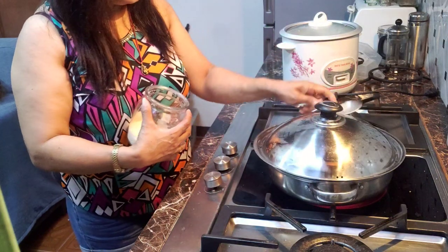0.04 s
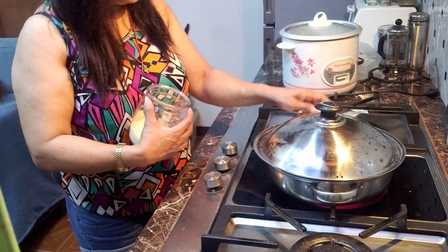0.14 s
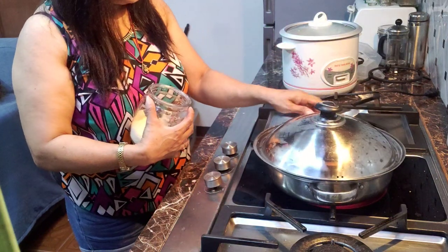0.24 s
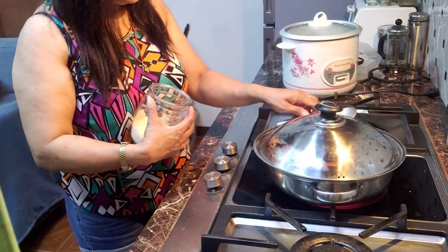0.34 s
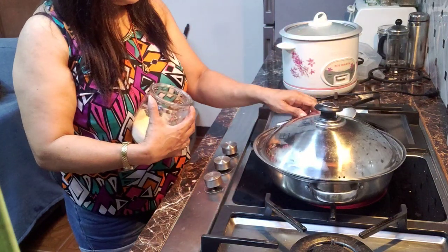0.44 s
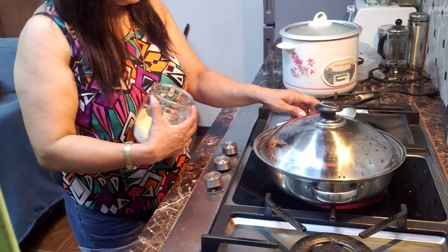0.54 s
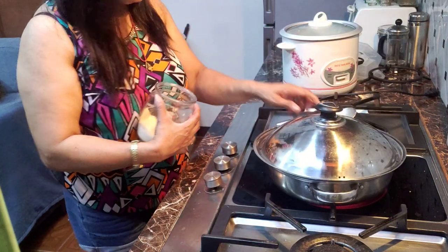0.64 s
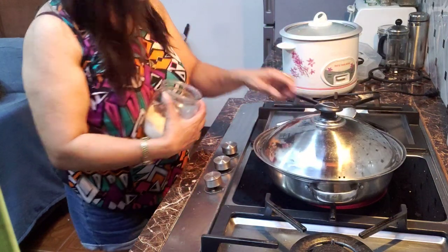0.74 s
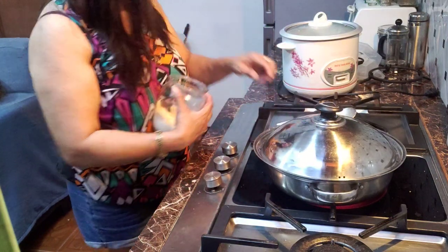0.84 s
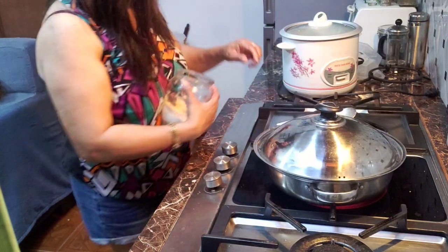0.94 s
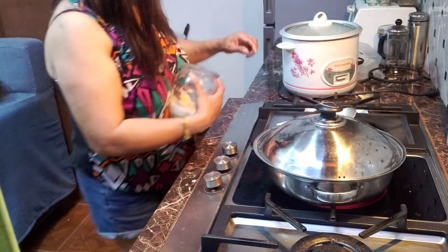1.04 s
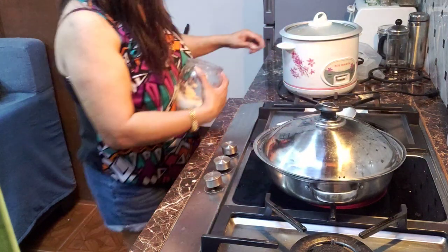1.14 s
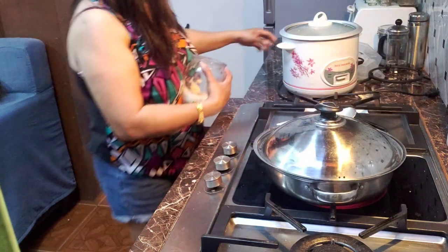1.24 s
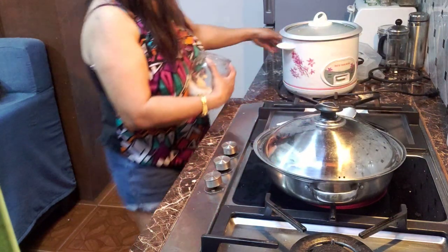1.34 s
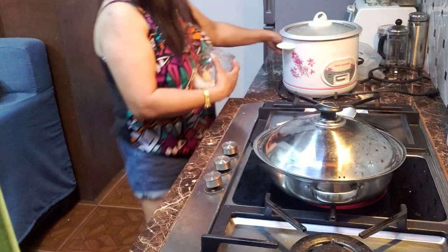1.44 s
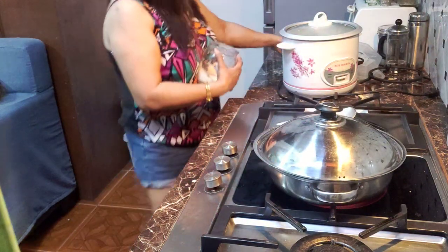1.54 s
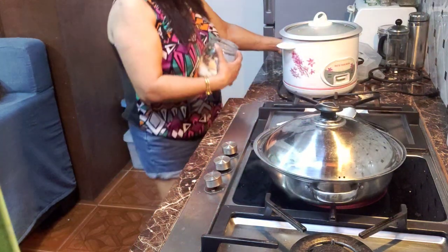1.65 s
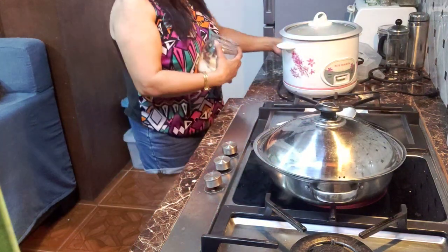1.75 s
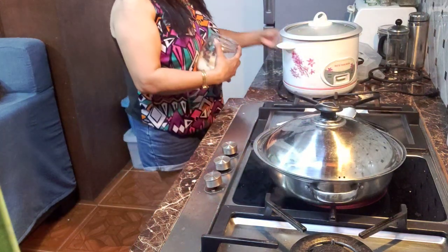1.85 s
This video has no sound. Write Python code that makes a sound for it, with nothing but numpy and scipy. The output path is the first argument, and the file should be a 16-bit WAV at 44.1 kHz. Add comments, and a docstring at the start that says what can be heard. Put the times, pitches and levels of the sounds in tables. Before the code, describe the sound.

A steel lid clanks onto a wide pan: knocks at about 0.25-0.34 s, then a second cluster at 0.42-0.47 s, with dull pan thuds, thin rim pings and bright grainy rattle fading by 0.6 s. Low uneven hum, deep rumble and faint hiss continue, with barely audible blips. Around 1.77-1.89 s a glass jar is softly set down with tiny ringing contacts. Short kitchen echo, close stereo, dulled top.

```python
"""A low lumpy hum, a deep rumble and a soft hiss run throughout in a small kitchen; faint blips come and go.
First a steel lid settles on a wide pan in two clusters of knocks: the pan thuds, the rim pings
and a rain of random grains makes a bright rattle. Later a jar is set down softly: its base thuds,
and its glass rings from tiny contacts and a short drag. The recorder turns down faint sound above the hum."""
import sys
import numpy as np
from scipy import signal
from scipy.fft import rfft, irfft, next_fast_len
from scipy.io import wavfile
from scipy.ndimage import uniform_filter1d

SR = 44100
rng = np.random.default_rng(int(sys.argv[2]) if len(sys.argv) > 2 else 0)


def wav_out(sig):
    """Save sig, one row per channel (or a flat mono array), as 16-bit PCM at SR to the path in sys.argv[1]."""
    wavfile.write(sys.argv[1], SR, np.round(np.clip(np.atleast_2d(sig).T, -1, 1) * 32767).astype(np.int16))


N = 83790
STRIKE_SPREAD_DB = 2.5  # chance in how hard each hit drives each mode


def from_db(db):
    """Decibels to gain."""
    return 10 ** (np.asarray(db, float) / 20)


def rms_one(x):
    """Scale to rms 1."""
    return x / np.sqrt(np.mean(x ** 2) + 1e-20)


def at_hz(points, hz):
    """Read a table between its points, on a log-frequency axis."""
    table_hz, values = np.array(points).T
    return np.interp(np.log(np.maximum(hz, 1)), np.log(table_hz), values)


def over_time(times, values):
    """Draw straight lines between points in time, one value per sample."""
    return np.interp(np.arange(N) / SR, times, values)


def lean(db):
    """Split a left-minus-right difference evenly over the two sides, in dB."""
    return db * np.array([[.5], [-.5]])


def colour(x, spectrum):
    """Shape a noise by a spectrum in dB, silent outside it; rms 1."""
    hz = np.fft.rfftfreq(N, 1 / SR)
    inside = (hz > spectrum[0][0]) & (hz < spectrum[-1][0])
    return rms_one(irfft(rfft(x) * from_db(at_hz(spectrum, hz)) * inside, N))


def band_pass(x, order, low_hz, high_hz):
    """Keep the sound between two pitches."""
    sos = signal.butter(order, [low_hz, high_hz], "band", fs=SR, output="sos")
    return signal.sosfilt(sos, x)


def drift(rate_hz):
    """Slow random wandering of rms 1: noise smoothed twice, made at every 40th sample."""
    r = np.exp(-80 * np.pi * rate_hz / SR)
    noise = rng.standard_normal(N // 40 + 2002)
    slow = signal.lfilter([1], [1, -2 * r, r * r], noise)[2000:]  # skip the start-up
    return np.interp(np.arange(N) / 40, np.arange(len(slow)), rms_one(slow))


def ring(clicks, hz, t60):
    """A unit click sets a sine of about height 1 ringing, which falls by 60 dB in t60 seconds."""
    r, w = from_db(-60 / (t60 * SR)), 2 * np.pi * hz / SR
    return signal.lfilter([0, np.sin(w)], [1, -2 * r * np.cos(w), r * r], clicks)


def strike(s, db, modes):
    """Hits at times s ring the modes; db holds one strength per hit and mode."""
    out = np.zeros(N)
    for k, (hz, level_db, t60) in enumerate(modes):
        clicks = np.full(N, 1e-18)
        clicks[(s * SR).astype(int)] = from_db(db[:, k] + level_db)
        out += ring(clicks, hz, t60)
    return out


def sing(grains, modes):
    """Modes kept ringing by a stream of grains; rms 1."""
    return rms_one(sum(from_db(db) * rms_one(ring(grains, hz, t60)) for hz, db, t60 in modes))


def octaves_off(modes, favoured_hz, most):
    """How far each mode lies from the pitch each hit favours, in octaves up to a limit."""
    mode_hz = np.array(modes)[:, 0]
    return np.minimum(np.abs(np.log2(mode_hz / favoured_hz[:, None])), most)


SHAKE_ATTACK_S = 0.0059


def dying(s, db, t60):
    """Each hit at a time s adds power that rises quickly and falls by 60 dB in t60 seconds."""
    t = np.maximum(np.arange(N) / SR - np.asarray(s)[:, None], 0)
    fall = from_db(2 * (db[:, None] - 60 * t / t60))  # doubled dB: power
    rise = 1 - np.exp(-t / SHAKE_ATTACK_S)
    return np.sqrt((fall * rise).sum(axis=0))


# rise and fall of the hum: (time [s], level [dB], left minus right [dB])
HUM_LEVEL = [(0, -41, 2.5), (.055, -48, 1), (0.079, -53.5, 4), (0.219, -52, 7), (.62, -52.5, 1),
             (.75, -51, 5), (0.849, -55, 7.5), (0.999, -55, 6), (1.12, -62.5, 14.5), (1.165, -51.5, 7),
             (1.22, -64.5, 18), (1.28, -46, 9), (1.35, -50, 2.5), (1.419, -60, 15), (1.501, -52.5, 7.5),
             (1.591, -53, 11), (1.66, -55.5, 7), (1.759, -56, 15), (1.9, -56.5, 4)]
# colour of the hum: (pitch [Hz], level [dB per Hz])
HUM_COLOUR = [(100, -34.5), (170, -9.5), (189, -17), (248, 2), (279, -4), (312, 0.5), (349, -7.5),
              (393, 0.5), (690, -38.5), (1000, -44), (1300, -63), (2200, -120)]
HUM_LUMPS_DB, HUM_LUMPS_HZ = 2.4, 19
HUM_LIKENESS = 0.8  # left-right likeness, 0 to 1


def hum():
    """Low noise in half-octave bands that swell and sink in lumps."""
    left, other = [colour(w, HUM_COLOUR) for w in rng.standard_normal((2, N))]
    right = HUM_LIKENESS * left + np.sqrt(1 - HUM_LIKENESS ** 2) * other
    both = np.array([left, right])
    out, together = 0, drift(HUM_LUMPS_HZ)
    edges = 80 * 2 ** np.arange(0, 4.6, .5)
    for low, high in zip(edges, edges[1:]):
        sos = signal.butter(2, [low, high], "band", fs=SR, output="sos")
        band = signal.sosfiltfilt(sos, both, padtype="even", padlen=SR // 10)
        # a little swelling shared by all bands, the rest each band's own and slower
        lumps = 0.23 * together + drift(HUM_LUMPS_HZ / 2)
        out = out + band * from_db(HUM_LUMPS_DB * lumps)
    s, db, lean_db = np.transpose(HUM_LEVEL)
    return rms_one(out) * from_db(over_time(s, db) + lean(over_time(s, lean_db)))


# colour of the rumble: (pitch [Hz], level [dB per Hz])
RUMBLE_COLOUR = [(12, -53), (38, -26.5), (59, -20), (77, -8.5), (155, 0), (180, -16), (230, -31.5),
                 (400, -120)]
# slow swell added to the base level: (time [s], level [dB])
RUMBLE_SWELL = [(.3, 5), (.8, 3.5), (1.12, -7.5), (1.349, -0.5), (1.9, 8.5)]
RUMBLE_BASE_DB = -66.5


def rumble():
    """Deep noise that swells slowly, mostly alike on both sides."""
    a, b = [colour(w, RUMBLE_COLOUR) for w in rng.standard_normal((2, N))]
    swell_db = over_time(*np.transpose(RUMBLE_SWELL)) + 2.5 * drift(2.2)
    sides = np.array([1.2 * a, 0.73 * a + .3 * b])
    return from_db(RUMBLE_BASE_DB + swell_db) * sides


# colour of the hiss: (pitch [Hz], level [dB per Hz])
HISS_COLOUR = [(530, -20.5), (900, -1.5), (1260, -25.5), (1400, -12), (1670, -15.5), (4010, -20.5),
               (6650, -10.5), (8400, -18.5), (10900, -62)]
HISS_DB = -82.5


def hiss():
    """Steady coloured noise, separate on each side."""
    return from_db(HISS_DB) * np.array([colour(w, HISS_COLOUR) for w in rng.standard_normal((2, N))])


# faint blips: (time [s], length [s], pitch [Hz], level before the swell [dB rms], left minus right [dB])
BLIPS = [(0.109, 0.049, 915, -74, -9), (1.052, 0.11, 6900, -81.5, 12), (1.082, 0.061, 736, -77, 6.5),
         (1.26, 0.026, 509.4, -62, 7.5), (1.365, 0.048, 900, -75, -7), (1.347, 0.072, 1980, -87, 13.5),
         (1.366, 0.044, 5500, -89, 5), (1.582, .02, 2400, -91, 6.5), (1.701, 0.037, 7420, -87, -7.5),
         (1.704, 0.016, 2500, -82, 10), (1.701, 0.031, 1980, -88, 3.5)]
BLIP_HALF_WIDTH_HZ = 70.0


def blips():
    """Short swells of narrow noise."""
    out, t = np.zeros((2, N)), np.arange(N) / SR
    for s, length, hz, db, lean_db in BLIPS:
        noise = band_pass(rng.standard_normal(N), 2, hz - BLIP_HALF_WIDTH_HZ, hz + BLIP_HALF_WIDTH_HZ)
        swell = np.sin(np.pi * np.clip((t - s) / length, 0, 1))
        out += rms_one(noise) * swell * from_db(db + lean(lean_db))
    return out


# lid knocks: (time [s], thud strength [dB], favoured thud pitch [Hz], rattle strength [dB],
#              rim ping strength [dB])
KNOCKS = [(0.2452, -12.5, 315, -40.5, -46.5), (.268, -17, 388, -42, -58.5),
          (.277, -15.5, 384, -41.5, -53.5), (0.2968, -7.5, 335.6, -30.5, -30),
          (0.313, -11.5, 352, -33, -27.5), (.328, -13.5, 385.6, -49, -46.5),
          (0.343, -22.5, 269.4, -56.5, -58.5), (0.4167, -7.5, 401, -29, -31),
          (0.4381, -4.5, 342.4, -35, -41), (.447, -14, 370, -34.5, -55.5), (.455, -18.5, 319.6, -41.5, -52),
          (0.472, -26, 394, -44, -38), (0.501, -32.5, 275.2, -60.5, -60), (0.543, -36, 315, -64, -84.5),
          (.582, -36.5, 332, -54, -90)]
# ringing modes of the pan body: (pitch [Hz], level [dB], time to fall 60 dB [s])
PAN_MODES = [(158, -15, 0.3), (252.8, -0.5, 0.26), (315.3, 0, 0.12), (377.7, 2.5, 0.1), (447, -8, 0.12),
             (559.6, -11, .1), (617.6, -11, 0.29), (810.8, -8.5, .3), (928, -3.5, 0.19)]
# ringing modes of the lid rim: (pitch [Hz], level [dB], time to fall 60 dB [s])
RIM_MODES = [(1328, -12, .08), (2180, -22.5, .08), (2782, -15.5, 0.19), (3075, -12, 0.2), (3440, -18, 0.12),
             (4374, -17.5, 0.082), (5165, -3.5, 0.061), (5570, -6.5, 0.09), (6090, -3, 0.061),
             (6180, -6, .06), (6660, -13.5, 0.12), (6950, 2.5, 0.05), (7230, -8.5, 0.08)]
# colour of the rattle: (pitch [Hz], level [dB per Hz])
RATTLE_COLOUR = [(500, -11), (763, -18.5), (977, -6.5), (1130, -26), (1340, -16.5), (2200, -28),
                 (3060, -22.5), (4200, -28.5), (5300, -20.5), (6880, -12.5), (7800, -18.5), (8300, -45.5)]
THUD_DB, PAN_FAVOUR_DB_PER_OCT, THUD_DELAY_S = -6, 25, 0.0013
THUD_LOW_HZ, THUD_HIGH_HZ = 218, 697  # the contact is soft
RATTLE_PER_S, RATTLE_T60_S = 2800, 0.24
RIM_SINGS_DB = -9.5  # the rattle also keeps the rim ringing
STOVE_DB, STOVE_T60_S = -16, 0.42  # the knocks shake the stove


def lid():
    """Each knock thuds in the pan body, pings the rim and sets off a grainy rattle; two draws of it."""
    s, thud_db, thud_hz, rattle_db, ping_db = np.transpose(KNOCKS)
    favour_db = -PAN_FAVOUR_DB_PER_OCT * octaves_off(PAN_MODES, thud_hz, .6)
    luck_db = STRIKE_SPREAD_DB * rng.standard_normal(favour_db.shape)
    thud = strike(s + THUD_DELAY_S, thud_db[:, None] + THUD_DB + favour_db + luck_db, PAN_MODES)
    thud = band_pass(thud, 3, THUD_LOW_HZ, THUD_HIGH_HZ)
    shake = dying(s, rattle_db, RATTLE_T60_S)
    stove = dying(s, rattle_db, STOVE_T60_S) * from_db(STOVE_DB)
    stove = stove * colour(rng.standard_normal(N), RUMBLE_COLOUR)
    out = []
    for _ in range(2):
        grains = rng.standard_normal(N) * (rng.random(N) < RATTLE_PER_S / SR)
        rattle = colour(grains, RATTLE_COLOUR) + from_db(RIM_SINGS_DB) * sing(grains, RIM_MODES)
        ping_luck_db = STRIKE_SPREAD_DB * rng.standard_normal((len(s), len(RIM_MODES)))
        ping = strike(s, ping_db[:, None] + ping_luck_db, RIM_MODES)
        out.append(thud + stove + ping + shake * rattle)
    return out


# contacts of the jar: (time [s], thud strength [dB], favoured thud pitch [Hz], glass strength [dB],
#                       favoured glass pitch [Hz])
JAR_CONTACTS = [(1.771, -50.5, 600, -66, 6380), (1.794, -37.5, 266, -83.5, 5530),
                (1.806, -41, 465, -70.5, 6000), (1.816, -46.5, 464, -77.5, 1930),
                (1.825, -35, 246, -70.5, 7030), (1.832, -46, 304.8, -70.5, 4050),
                (1.842, -45.5, 633, -90, 2420), (1.862, -48.5, 394, -76, 6830),
                (1.886, -47.5, 300, -76, 7650)]
# ringing modes of the dull base: (pitch [Hz], level [dB], time to fall 60 dB [s])
BASE_MODES = [(249.8, 2.5, 0.1), (322.8, -0.5, .09), (392, -1, .07), (482, 1.5, .06), (610, -1.5, 0.055),
              (866, -3.5, 0.13), (920, -17, 0.066), (1150, -14, 0.083)]
# ringing modes of the glass wall when free: (pitch [Hz], level [dB], time to fall 60 dB [s])
GLASS_MODES = [(1810, 1.5, 0.15), (1953, -1, .06), (2410, -7.5, .05), (2790, -7.5, .04), (4050, -5, 0.11),
               (4460, -8, 0.054), (5400, -8, 0.048), (6040, -6.5, .04), (6410, 3.5, .04), (7080, 1, .05),
               (7160, -7.5, 0.043)]
JAR_THUD_DB, BASE_FAVOUR_DB_PER_OCT, GLASS_FAVOUR_DB_PER_OCT = -3.5, 22, 30
JAR_SOFT_HZ = 1250  # the base lands on something soft
SMEAR_PEAK_S = 0.00205  # the tiny contacts are strongest this long after each hit
DRAG_DB, DRAG_T60_S = -3, 0.26  # the base drags on and keeps the glass ringing
DRAG_DAMPS = .3  # share of the ring time left while the base drags


def jar():
    """The base thuds softly; tiny contacts and the drag after ring the glass; two draws of it."""
    s, thud_db, thud_hz, glass_db, glass_hz = np.transpose(JAR_CONTACTS)
    favour_db = -BASE_FAVOUR_DB_PER_OCT * octaves_off(BASE_MODES, thud_hz, 1)
    luck_db = STRIKE_SPREAD_DB * rng.standard_normal(favour_db.shape)
    thud = strike(s, thud_db[:, None] + JAR_THUD_DB + favour_db + luck_db, BASE_MODES)
    thud = band_pass(thud, 4, THUD_LOW_HZ, JAR_SOFT_HZ)
    favour_db = -GLASS_FAVOUR_DB_PER_OCT * octaves_off(GLASS_MODES, glass_hz, .5)
    luck_db = STRIKE_SPREAD_DB * rng.standard_normal(favour_db.shape)
    glass = strike(s, glass_db[:, None] + favour_db + luck_db, GLASS_MODES)
    drag = dying(s, glass_db + DRAG_DB, DRAG_T60_S)
    damped_modes = np.multiply(GLASS_MODES, [1, 1, DRAG_DAMPS])
    t = np.arange(800) / SR
    out = []
    for _ in range(2):
        smear = rng.standard_normal(len(t)) * t * np.exp(-t / SMEAR_PEAK_S)
        smear = smear / np.sqrt((smear ** 2).sum())  # energy 1
        ringing = signal.fftconvolve(glass, smear)[:N]
        out.append(thud + ringing + drag * sing(rng.standard_normal(N), damped_modes))
    return out


ROOM_T60_S, ROOM_DB = 0.46, -13
WALL_CUT_HZ = 6800  # treble cut per round of a 35 ms delay; shorter delays cut less


def kitchen(x):
    """Echoes of the room: ten feedback delays a side, duller on every round."""
    size = next_fast_len(N + SR)
    hz = np.fft.rfftfreq(size, 1 / SR)
    out = np.zeros((2, len(hz)), complex)
    for k, lag in enumerate(rng.uniform(0.0071, .035, 20)):
        fade = from_db(-60 * lag / ROOM_T60_S)
        dull = 1 / (1 + 1j * hz / WALL_CUT_HZ * lag / 0.035)
        loop = fade * dull * np.exp(-2j * np.pi * hz * lag)
        out[k % 2] += loop / (1 - loop) * (-1) ** (k // 2)  # all rounds at once
    return irfft(out / np.sqrt(10) * rfft(x, size), size)[:, :N]


# how much louder the left side is: (pitch [Hz], left minus right [dB])
LEFT_LOUDER = [(100, 3.5), (500, 6.5), (1000, -0.2), (2500, -2.5), (5000, 10), (8000, 5)]
# left-right likeness of lid, jar and room: (pitch [Hz], likeness [0-1])
LIKENESS = [(300, 0.96), (700, 0.85), (1200, 0), (8000, 0)]
LEFT_LEAD_S = 0.00017


def microphones(x, other):
    """Two microphones: the left earlier and louder at most pitches, treble unrelated."""
    size = next_fast_len(N + SR // 4)
    hz = np.fft.rfftfreq(size, 1 / SR)
    alike = np.clip(at_hz(LIKENESS, hz), 0, 1)
    tilt = from_db(at_hz(LEFT_LOUDER, hz) / 2)  # half up on the left, half down on the right
    a, b = rfft(x, size), rfft(other, size)
    right = (alike * a + np.sqrt(1 - alike ** 2) * b) / tilt
    right = right * np.exp(-2j * np.pi * hz * LEFT_LEAD_S)
    return irfft([a * tilt, right], size)[:, :N]


def scene():
    """Lid and jar with the room at the microphones, over hum, rumble, hiss and blips."""
    background = hum() + rumble() + hiss() + blips()
    near = np.add(lid(), jar())
    return microphones(*(near + from_db(ROOM_DB) * kitchen(near))) + background


GATE_FROM_HZ = 620
GATE_DB, GATE_FLOOR_DB = 0, -6  # threshold over the usual floor, deepest cut


def suppress(x):
    """Narrow bands above the hum are turned down while they lie near their usual floor."""
    hz, _, z = signal.stft(x, SR, nperseg=1024, noverlap=768)
    power = uniform_filter1d(np.abs(z) ** 2, size=3, axis=1)  # smooth over pitch
    power = uniform_filter1d(power, size=3, axis=2) + 1e-30  # smooth over time
    usual = uniform_filter1d(np.median(power, axis=2, keepdims=True), size=9, axis=1)
    gain = np.maximum(1 - from_db(2 * GATE_DB) * usual / power, from_db(GATE_FLOOR_DB))
    gain[:, hz < GATE_FROM_HZ] = 1
    return signal.istft(z * gain, SR, nperseg=1024, noverlap=768)[1][:, :N]


SELF_NOISE_DB = -101.0
TOP_CUT_HZ = 8900  # 44 dB down from here up


def record(dry):
    """The recorder suppresses faint sound above the hum, cuts the top and adds a trace of self-noise."""
    sos = signal.cheby2(10, 44, TOP_CUT_HZ, fs=SR, output="sos")
    cut = signal.sosfilt(sos, suppress(dry))
    return cut + from_db(SELF_NOISE_DB) * rng.standard_normal(dry.shape)


dry = scene()
out = record(dry)
wav_out(out)
```